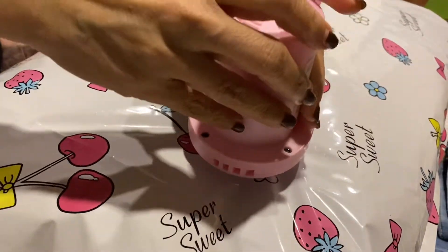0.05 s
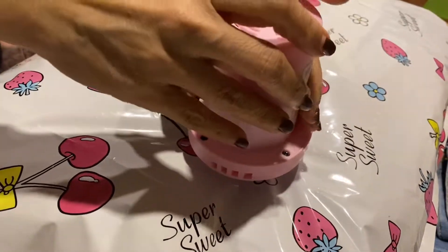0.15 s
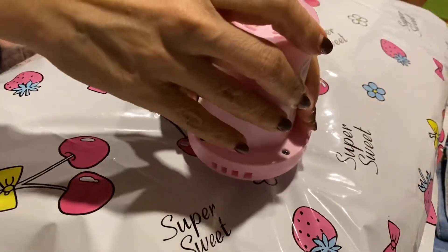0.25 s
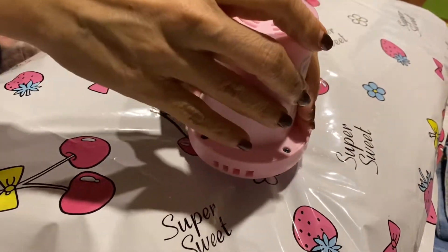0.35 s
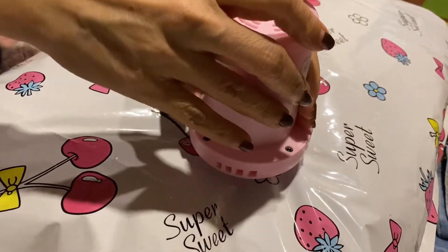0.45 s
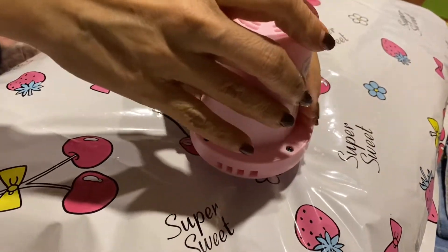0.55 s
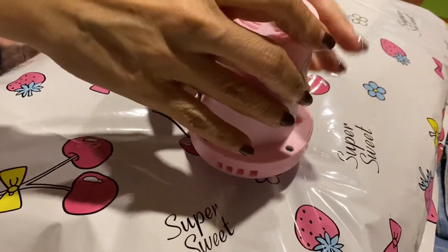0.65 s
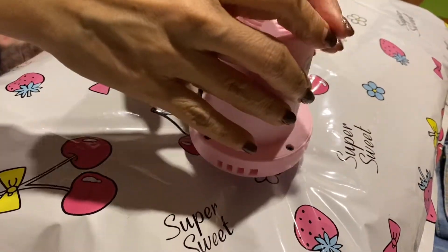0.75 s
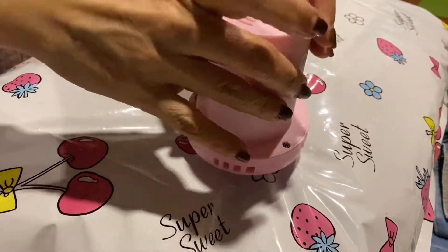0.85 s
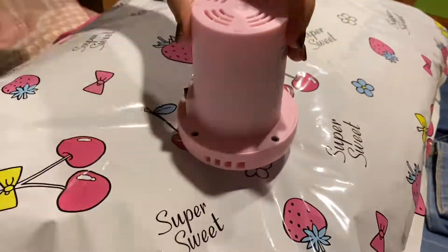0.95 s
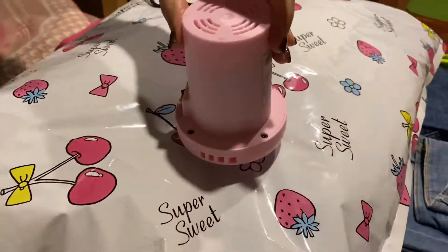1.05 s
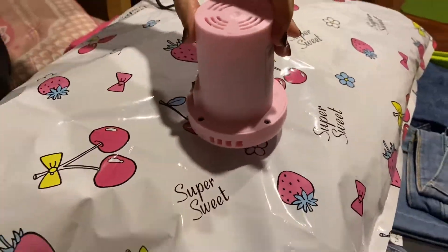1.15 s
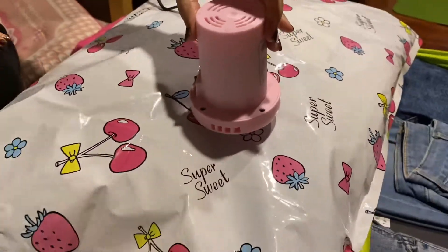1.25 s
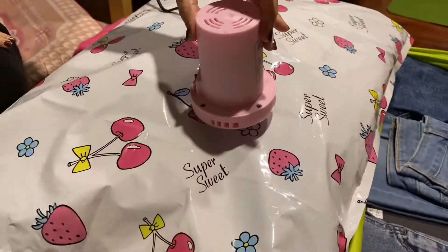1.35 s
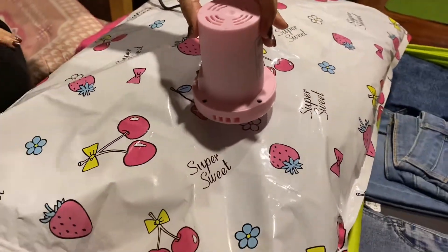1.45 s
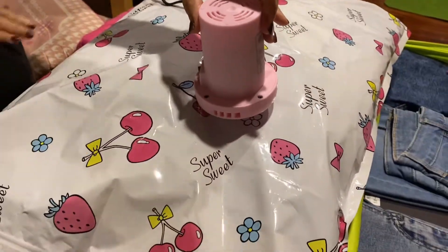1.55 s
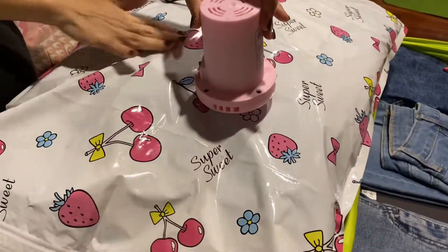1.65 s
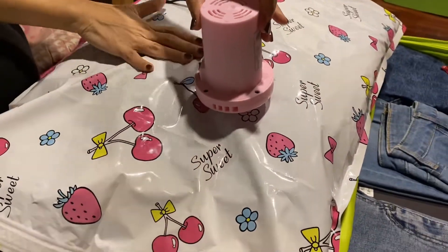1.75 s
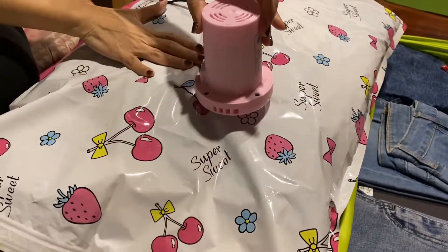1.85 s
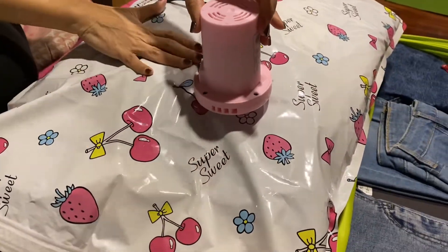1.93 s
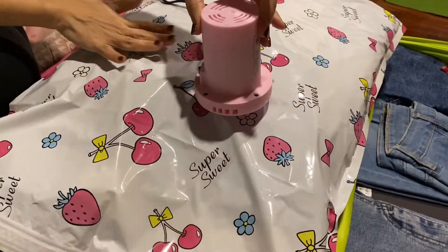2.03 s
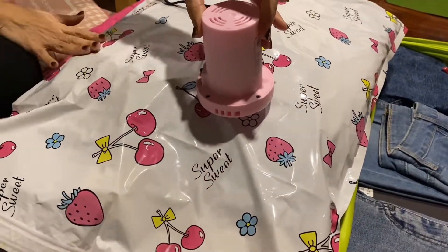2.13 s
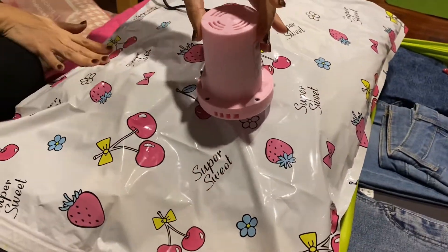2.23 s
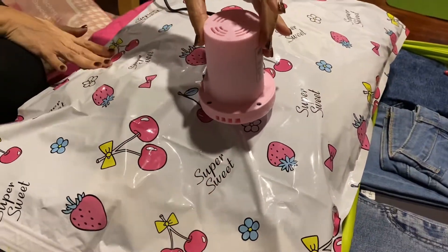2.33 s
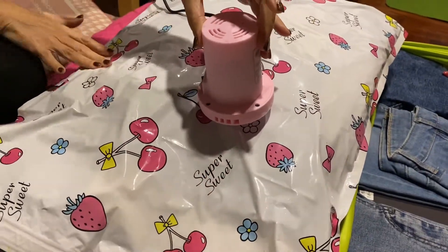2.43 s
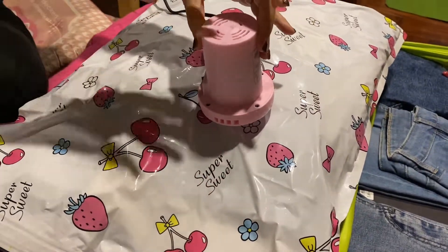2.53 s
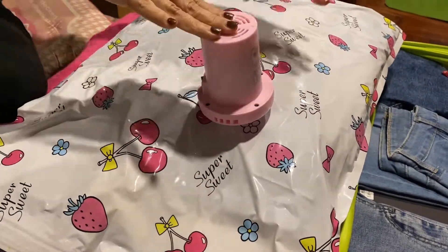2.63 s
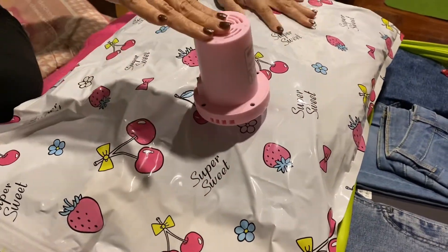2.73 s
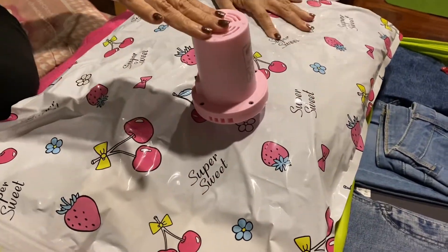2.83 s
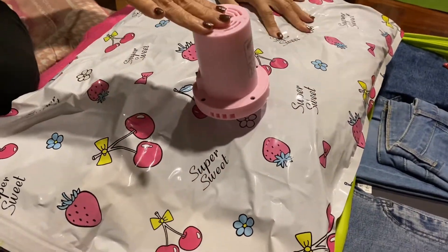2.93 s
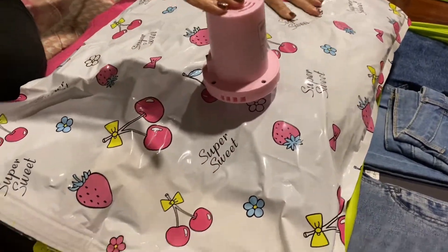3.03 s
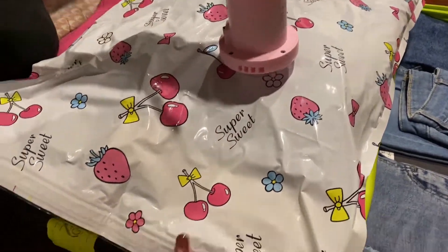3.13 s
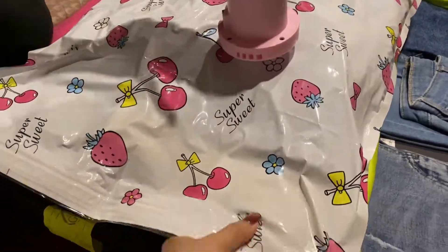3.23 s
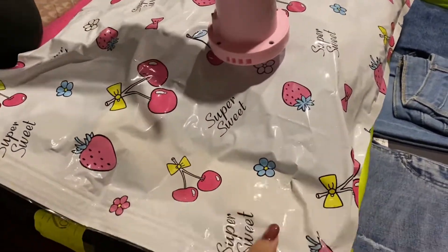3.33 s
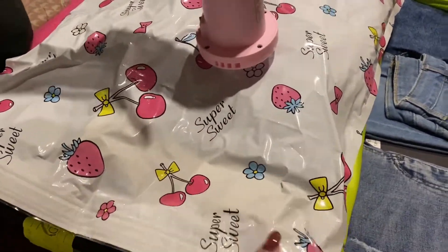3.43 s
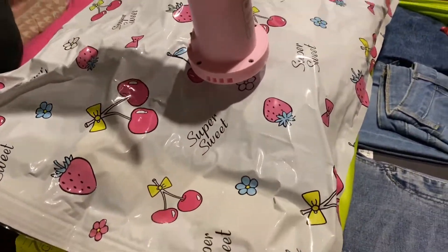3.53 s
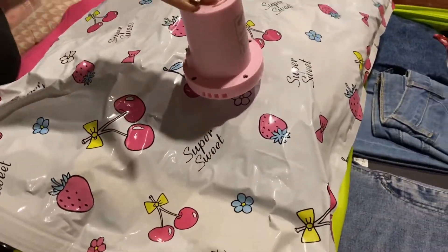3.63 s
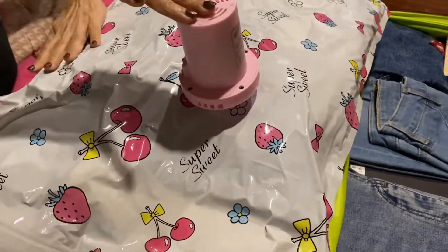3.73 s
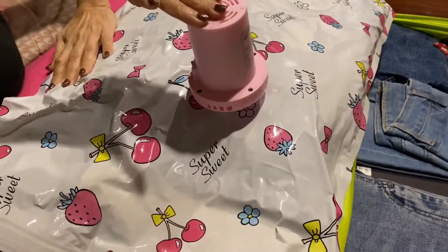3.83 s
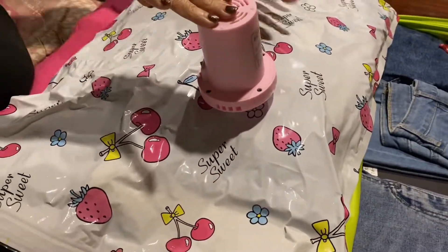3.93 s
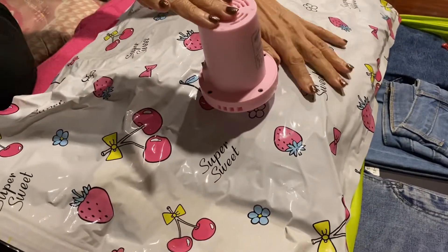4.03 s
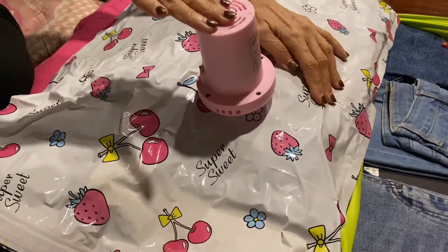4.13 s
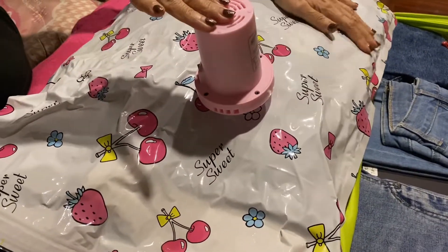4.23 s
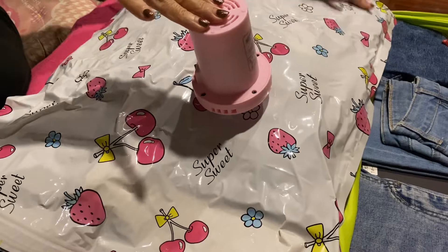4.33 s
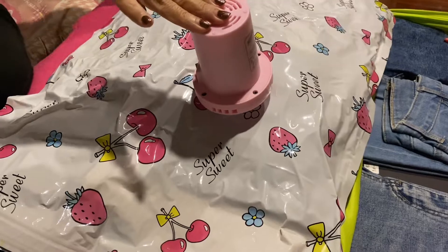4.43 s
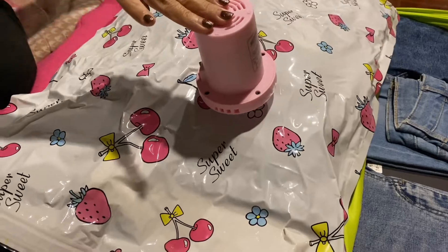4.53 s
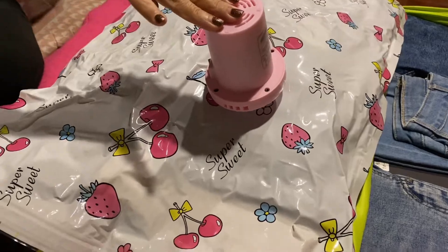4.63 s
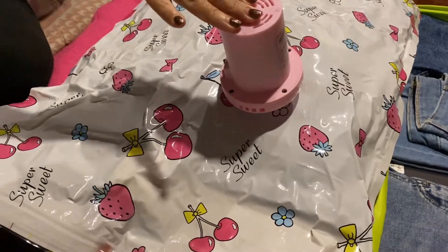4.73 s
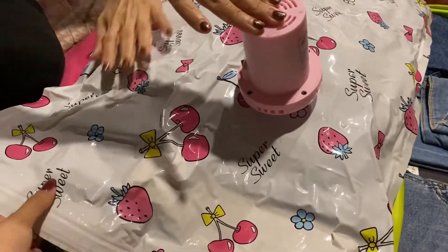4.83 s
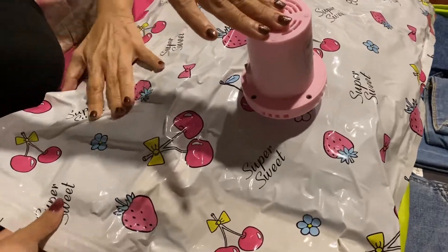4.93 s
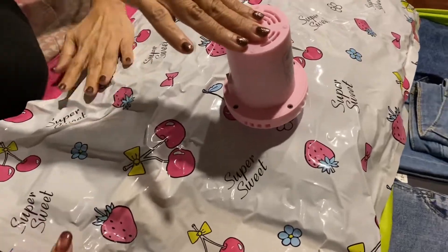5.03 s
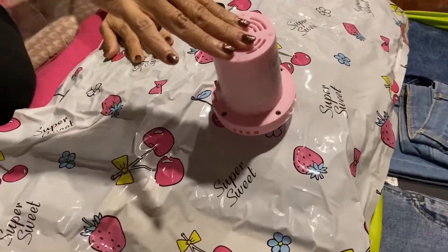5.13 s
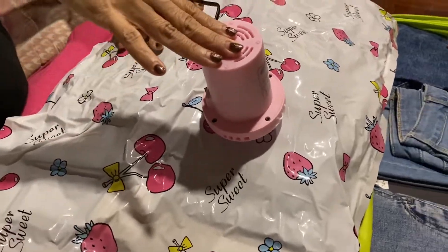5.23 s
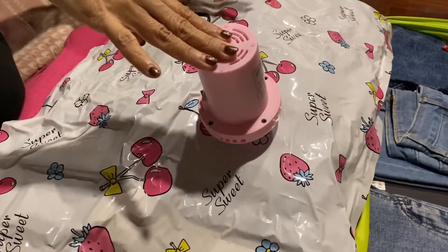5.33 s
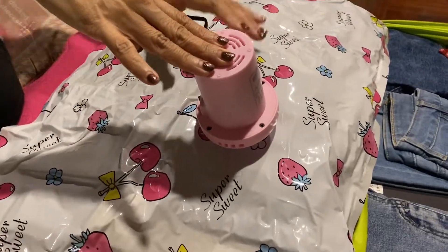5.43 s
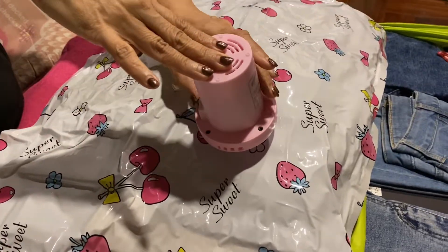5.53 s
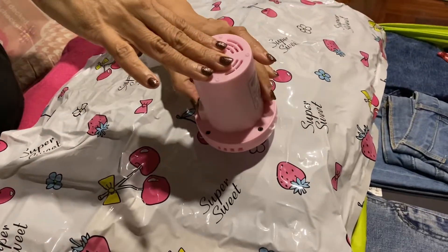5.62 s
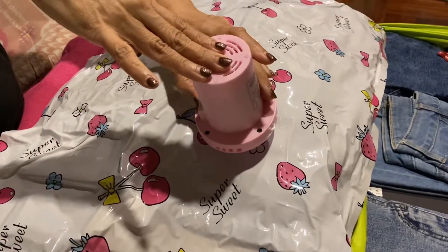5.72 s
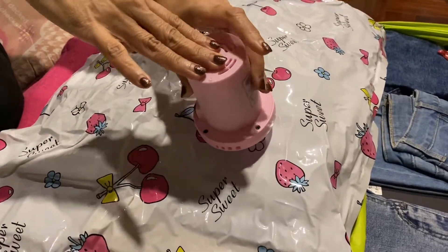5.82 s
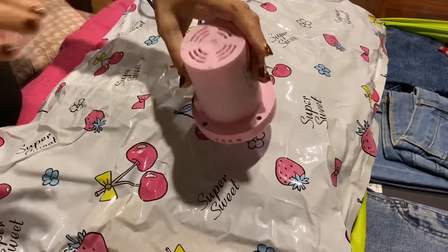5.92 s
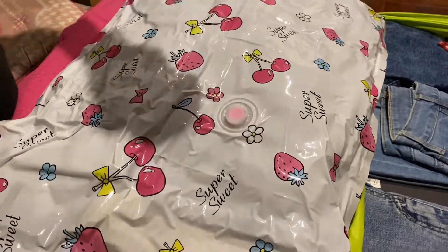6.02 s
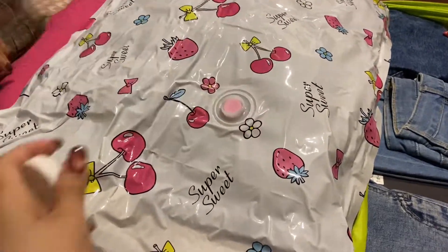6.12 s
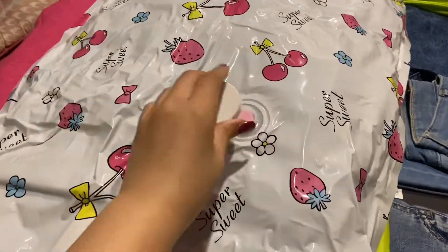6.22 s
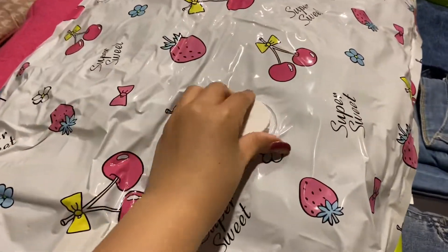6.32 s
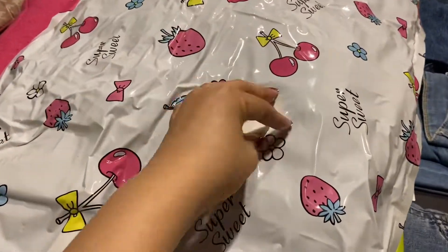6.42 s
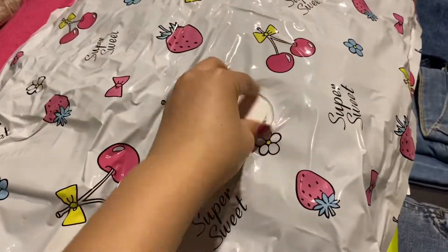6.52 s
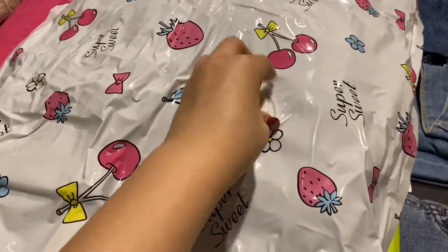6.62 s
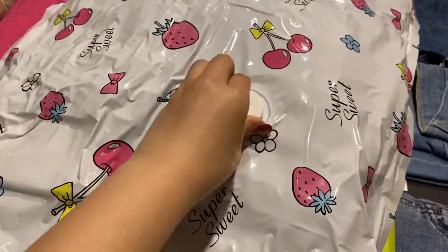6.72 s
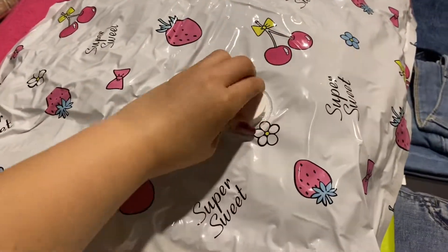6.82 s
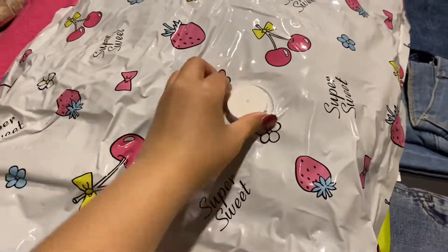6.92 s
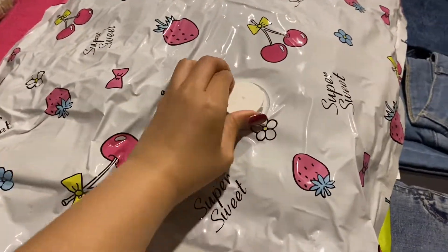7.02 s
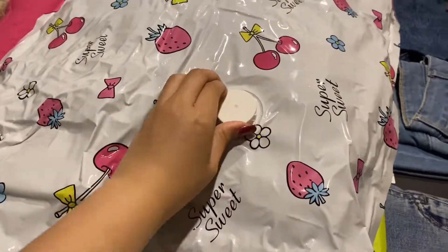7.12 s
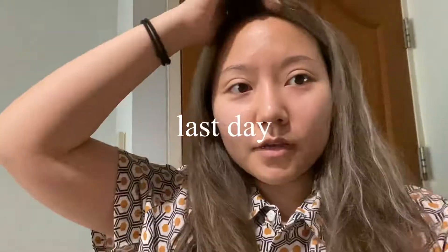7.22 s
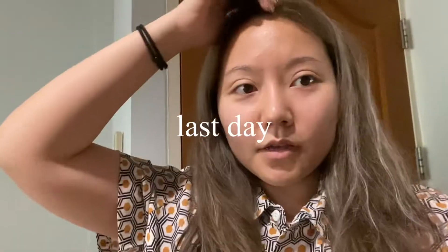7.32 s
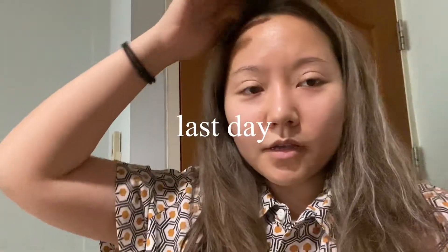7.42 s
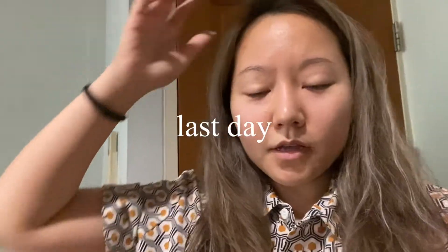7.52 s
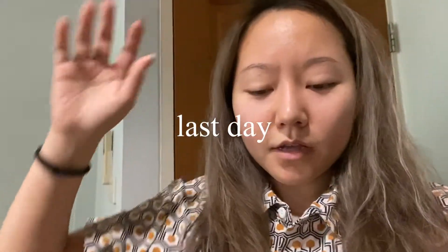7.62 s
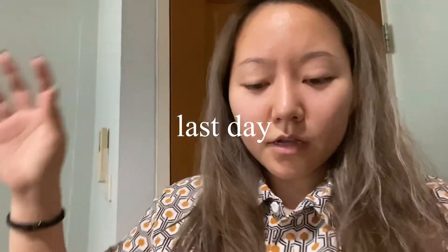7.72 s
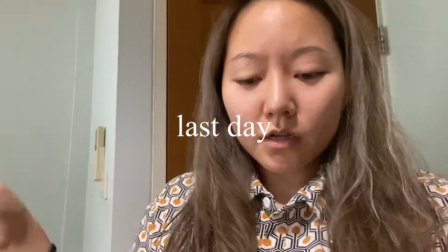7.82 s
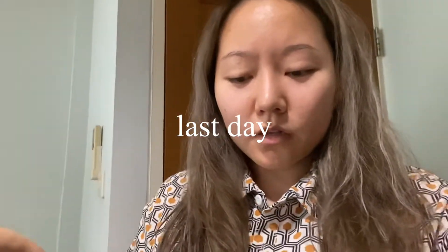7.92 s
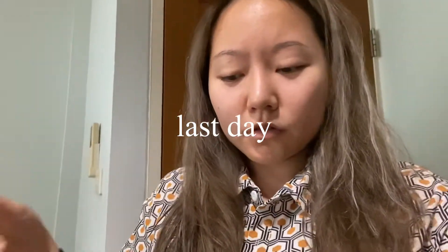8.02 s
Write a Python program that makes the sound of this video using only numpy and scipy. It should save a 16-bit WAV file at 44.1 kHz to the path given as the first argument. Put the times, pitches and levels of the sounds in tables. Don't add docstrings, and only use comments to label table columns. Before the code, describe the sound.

A phone held near a little handheld pump indoors: light handling taps, a switch tick, then a motor climbing in pitch. The sound suddenly becomes sped up, a piercing steady whine with rushing, hissing air that dips briefly twice and turns more resonant and whistling. Power goes off and the pitch slides down to silence. Sparse thin plastic crackles and tiny cap scrapes follow. Finally, a different softly humming room with two hard plastic snaps, then only hum.

```python
import sys
import numpy as np
from scipy import signal
from scipy.fft import rfft, irfft, next_fast_len
from scipy.io import wavfile
from scipy.ndimage import map_coordinates

SR = 44100
rng = np.random.default_rng(int(sys.argv[2]) if len(sys.argv) > 2 else 0)


def transcribe(u):
    v = np.clip(np.atleast_2d(u).T, -1, 1)
    q = np.round(v * 32767).astype(np.int16)
    wavfile.write(sys.argv[1], SR, q)


def rack_gain(trim_db):
    fader = np.asarray(trim_db, float)
    return 10 ** (fader / 20)


N = 355622
TIME_S = np.arange(N) / SR

CUTS = (0, .821, 7.205, 9)
PUMP, FAST_PUMP, BEDROOM, FAST_ROOM, OTHER_ROOM = (0, 1), (0, 4), (1, 1), (1, 4), (2, 1)
ON_S, OFF_S = .312, 5.677


def unit(x):
    return x / np.sqrt(np.mean(np.mean(np.atleast_2d(x), 0) ** 2) + 1e-20)


def along(points, hz):
    f, v = np.transpose(points)
    return np.interp(np.log(hz + 1), np.log(f + 1), v)


def curves(rows):
    s, *cols = np.transpose(rows)
    return [np.interp(TIME_S, s, c) for c in cols]


def between(t0, t1, fade=0.0023):
    return np.clip((TIME_S - t0) / fade + 1, 0, 1) * np.clip((t1 - TIME_S) / fade, 0, 1)


def bump(hz, centre_hz, width_hz):
    return np.exp(-((hz - centre_hz) / width_hz) ** 2)


def wobble(rate):
    return map_coordinates(rng.standard_normal(int(N * rate / SR) + 4), [np.arange(N) * rate / SR])


def filtered(x, response):
    m = next_fast_len(N + 8192)
    return irfft(rfft(x, m) * response(np.fft.rfftfreq(m, 1 / SR)), m)[..., :N]


def modes(table):
    def response(f):
        return sum((-1) ** k * rack_gain(db) * 1j * f * w / (c * c - f * f + 1j * f * w)
                   for k, (c, w, db) in enumerate(table))
    return response


def ports(pair, place, gain, alike=None):
    # pitch_hz, likeness_0_to_1, left_lead_rad, left_over_right_db
    port_table = [
        [(50, .95, 0, -1), (200, .95, .15, -1), (500, .95, .5, 2), (700, .8, .8, 5), (950, .92, .3, 2),
         (1250, .8, .8, 4), (1620, .6, 2.5, 4), (2000, .6, 6, 1), (2750, .7, 8.6, -1), (3120, .8, 9.1, 0),
         (3900, .6, 11.7, 0), (16000, .5, 40, 0)],
        [(20, .95, 0, -1), (200, .88, .2, -1), (330, .75, .4, -1), (700, .4, 1, 3), (1300, .4, 2.5, 1),
         (16000, .4, 30, -1)],
        [(60, .85, .1, -2), (200, .86, .1, -2), (450, .45, .4, 0), (800, .27, 1.5, 1), (2000, .25, 1.9, -2),
         (16000, .4, 9, -1)],
    ]
    row, pace = place

    def response(hz):
        f, *cols = np.transpose(port_table[row])
        like, lead, lean_db = (np.interp(hz / pace, f, c) for c in cols)
        likeness = like if alike is None else alike + 0 * hz
        turn = np.arccos(np.clip(likeness, 0, 1)) / 2
        left = rack_gain(lean_db / 2) * np.exp(.5j * lead)
        right = 1 / left
        a, b = np.cos(turn), np.sin(turn)
        middle = np.hypot(a * abs(left + right), b * abs(left - right)) / 2
        matrix = np.array([[a * left, b * left], [a * right, -b * right]])
        return matrix * gain(hz) / np.maximum(middle, .2)
    return filtered(pair, response).sum(1)


def rush(colour, body, place, lo_hz=0, hi_hz=3e4):
    def gain(hz):
        peaks = 1 + sum(rack_gain(2 * db) / (1 + (2 * (hz - c) / w) ** 2) for c, w, db in body)
        return rack_gain(along(colour, hz)) * np.sqrt(peaks) * (hz >= lo_hz) * (hz < hi_hz)
    return unit(ports(rng.standard_normal((2, N)), place, gain))


def whine(shaft_hz, orders, place, flutter_db, jitter):
    turns = np.cumsum(shaft_hz * (1 + jitter * wobble(60))) / SR
    x = 0
    for k, db in orders:
        level = rack_gain(db + 1.0 + flutter_db * wobble(40)) * (k * shaft_hz < 16000)
        x = x + level * np.sin(2 * np.pi * k * turns + k)
    return ports(np.array([x, 0 * x]), place, lambda hz: 1, alike=0.39)


def pumping():
    # time_s, shaft_hz, level_db
    spin = [(.82, 870, -44), (.85, 973, -37.5), (.9, 1162, -30), (.95, 1334, -33.5), (1, 1442, -34),
            (1.05, 1508, -33.5), (1.1, 1525, -38.5), (1.2, 1523, -40.5), (1.6, 1532, -47.5), (2, 1524, -45),
            (2.4, 1543, -46), (2.8, 1556, -50), (3.1, 1553, -44.5), (3.4, 1560, -48), (3.8, 1550, -50.5),
            (4.5, 1560, -43), (5.4, 1559, -45.5), (5.68, 1552, -45)]
    # time_s, covered_share
    hand = [(0, 0), (2.5, 0.16), (3.3, 0.52), (4.2, 0.84), (8, 0.71)]
    driven_hz, driven_db = curves(spin)
    cover = curves(hand)[0]
    choke_db = bag_choke()
    sag_hz_per_db, sag_s = 4.5, 0.0505
    keep = np.exp(-1 / (sag_s * SR))
    driven_hz = driven_hz - sag_hz_per_db * signal.lfilter([1 - keep], [1, -keep], choke_db)
    coast_s, friction_hz = .425, 490
    slowing = np.exp(-np.maximum(TIME_S - OFF_S, 0) / coast_s)
    hz = np.maximum((driven_hz + friction_hz) * slowing - friction_hz, 20)
    octaves = np.log2(hz / driven_hz)
    out = shaft_and_blades(hz, octaves, driven_db, cover, choke_db)
    out += vent_whistle(octaves, choke_db)
    out += casing_air(octaves, cover, choke_db)
    return out * between(0, 6.2, fade=0.055) + shell_ring()


def bag_choke():
    # start_s, length_s, depth_db
    chokes = [
        (2.6, 0.012, 9),
        (3.14, .075, 12.5),
    ]
    edge_s, open_s = .04, 0.0151
    return sum(db * between(s, 9, fade=edge_s) * between(0, s + length + open_s, fade=open_s)
               for s, length, db in chokes)


def shaft_and_blades(hz, octaves, driven_db, cover, choke_db):
    # shaft_multiple, over_shaft_db, gain_under_hand_db
    spin_orders = [(2, -7.5, -21), (3, -4.5, -5), (4, -10, -13), (5, -17.5, 4), (6, -15, -13),
                   (7, -6.5, -5.5)]
    # pitch_hz, level_db
    blade_answer = [(1700, -80), (2600, -62), (3480, -48.5), (4300, -34), (5150, -23.5), (5330, -37),
                    (5600, -37), (7400, -52), (9500, -54), (12000, -46)]
    # pitch_hz, level_db
    overtone = [(3600, -95), (4500, -71), (5600, -57), (7000, -64), (10400, -61), (11500, -84)]
    # time_s, over_answer_db
    blade_level = [(.82, 5.5), (.95, 10), (1.03, 3), (1.15, 9), (1.33, 7), (1.68, -5), (2, 0), (2.6, 1.5),
                   (3.3, 0.5), (3.8, 5), (4.3, 0), (4.9, 7), (5.2, -3), (5.66, 2), (5.72, -10)]
    coasting = TIME_S > OFF_S
    shaft_db = driven_db + 20 * octaves
    shaft_db += 8.5 * bump(hz, 1157, 54) * coasting
    shaft_db += (-4 * bump(hz, 1300, 46) + 0.1 * wobble(45)) * coasting
    blade_db = along(blade_answer, 8 * hz) + curves(blade_level)[0]
    blade_db += 2 * wobble(9) * (TIME_S < OFF_S) + .35 * choke_db
    upper_db = shaft_db - 11 * (1 - between(1.43, 7.4, fade=0.31))
    bearing_db = np.where(coasting, driven_db - 1 + 25 * octaves + 3 * wobble(50), -120)
    orders = [(1, shaft_db), (8, blade_db), (16, along(overtone, 16 * hz)), (1.19, bearing_db)]
    orders += [(k, upper_db + db + hand_db * cover) for k, db, hand_db in spin_orders]
    return whine(hz, orders, FAST_PUMP, flutter_db=0.0, jitter=0.00082)


def vent_whistle(octaves, choke_db):
    since_off = TIME_S - OFF_S
    level_db = -42 - 6 * abs(since_off) + 40 * octaves - choke_db
    return whine(3255 - 60 * since_off, [(1, level_db)], FAST_PUMP, flutter_db=2.0, jitter=0.00098)


def casing_air(octaves, cover, choke_db):
    # pitch_hz, level_db_per_hz
    colour = [(530, -38), (900, -20.5), (1400, -9.5), (1650, -10.5), (1950, 2.5), (2860, -2), (4150, 0.5),
              (5500, -3), (6560, -12), (8080, -10), (9800, -14.5), (11900, -16), (14800, -14.5),
              (15750, -13.5), (15950, -60)]
    # centre_hz, width_hz, level_db
    open_body = [(1910, 40, -20), (2455, 150, 3.5), (3358, 68, 9.5), (3720, 92, -4), (4200, 200, 6),
                 (10770, 560, 6.5)]
    # centre_hz, width_hz, level_db
    covered_body = [(1899, 100, 14), (2196, 210, 10), (2570, 69, 13), (3170, 30, -8), (3259, 69, 10.5),
                    (3700, 42, -4), (4007, 97, 6), (4122, 40, 11), (4660, 71, 6), (5040, 42, 7),
                    (5270, 60, 0), (5690, 94, 4.5), (6040, 44, 8), (7860, 44, 6.5)]
    # centre_hz, width_hz, level_db
    coasting_body = [(1730, 61, 10), (2200, 81, 8), (2480, 70, 7), (3150, 200, -1), (3700, 150, 6),
                     (4170, 150, 3), (5100, 300, -2)]
    # time_s, flow_db
    flow = [(.825, -34), (.87, -2), (.92, -4), (1, 1.5), (1.2, -6.5), (1.37, -1.6), (2.02, -4.5),
            (2.15, -2), (2.6, -0.7), (4.6, 0.57), (5.3, 1.5), (5.68, 2)]
    # level_db, flow_share, gain_under_hand_db, choke_share, coast_db_per_octave, surge_db
    layers = [
        (-44, 1.1, 5, 0.9, 17.5, -5),
        (-40, 0.9, -0.17, 0.62, 14.5, -30),
        (-50, 0.23, 1.4, 0.17, 11, -14.5),
    ]
    flow_db = curves(flow)[0]
    let_go_s = .04
    loose = between(OFF_S + let_go_s, 9, fade=let_go_s)
    from_peak_s = TIME_S - 0.913
    surge = rack_gain(-33.5 - np.maximum(-79 * from_peak_s, 30.5 * from_peak_s))
    out = 0
    bands_hz = [(0, 2900), (2900, 6000), (6000, 3e4)]
    for (db, flows, hand_db, choked, slope, surge_db), (lo, hi) in zip(layers, bands_hz):
        free = rush(colour, open_body, FAST_PUMP, lo, hi)
        shut = rush(colour, covered_body, FAST_PUMP, lo, hi)
        dying = rush(colour, coasting_body, FAST_PUMP, lo, hi)
        driven = np.sqrt(1 - cover) * free + np.sqrt(cover) * shut
        puffs = rack_gain(1.5 * wobble(35)) * dying
        level_db = db + flows * flow_db + hand_db * cover - choked * choke_db + slope * octaves
        level = np.hypot(rack_gain(level_db), rack_gain(surge_db) * surge)
        unsteady = rack_gain(0.47 * wobble(12) + 0.15 * wobble(220))
        out = out + level * unsteady * (np.sqrt(1 - loose) * driven + np.sqrt(loose) * puffs)
    surge_colour = [(900, -90), (1800, -42), (2600, 6), (3300, 5), (4400, 0.5), (6000, -17),
                    (15700, -8.5), (15950, -60)]
    return out + surge * rush(surge_colour, [], FAST_PUMP)


def shell_ring():
    # start_s, level_db, t60_s
    rings = [
        (5.966, -42, 0.081),
        (6.112, -59, 0.1),
        (6.19, -71, 0.17),
    ]
    out, t = np.zeros(N), np.arange(SR // 4) / SR
    for s, db, t60 in rings:
        swell = 1 - np.exp(-t / 0.0076)
        out[round(s * SR):][:len(t)] += rack_gain(db - 60 * t / t60) * swell * np.sin(2 * np.pi * 3140 * t)
    return out


def run_up():
    hz = np.clip(365 * (TIME_S - .268), 5, 400)
    octaves = np.log2(hz / 198)
    return run_up_tones(hz, octaves) + run_up_air(hz, octaves) + hum_and_whistle(hz) + coil_ticks()


def run_up_tones(hz, octaves):
    # shaft_multiple, over_shaft_db
    start_orders = [(2, -14), (3, -22), (4, -8), (6, -8)]
    # pitch_hz, level_db
    blade_answer = [(440, -66), (600, -46), (980, -36), (1300, -38), (1600, -36)]
    shaft_db = -33.5 + 20.5 * octaves
    orders = [(1, shaft_db), (8, along(blade_answer, 8 * hz))]
    orders += [(k, shaft_db + db) for k, db in start_orders]
    return whine(hz, orders, PUMP, flutter_db=0.5, jitter=0.0014) * between(0.4, 9, fade=.05)


def run_up_air(hz, octaves):
    # pitch_hz, level_db_per_hz
    colour = [(150, -54), (250, -11), (484, -4), (576, -1.5), (674, -1.5), (1400, -7.5), (1790, -8.5),
              (4410, -3), (8400, -20), (10200, -8.5), (12100, -27), (14700, -11), (16000, -43)]
    # centre_hz, width_hz, level_db
    body = [(464, 57, 8), (570, 57, 2), (664, 67, 8.5), (780, 58, -3), (815, 76, 5), (955, 160, 8.5),
            (1070, 66, 0)]
    # level_at_scene_change_db, slope_db_per_octave, while_aligning_db
    layers = [
        (-22.5, 15.5, -58),
        (-36, 16, -58),
        (-41.5, 26, -63),
    ]
    jolt = 1 + 11 * np.exp(-abs(TIME_S - ON_S) / 0.0043)
    align = jolt * between(0, 0.397, fade=0.045)
    roar, hiss, fizz = (np.hypot(rack_gain(db + slope * octaves), rack_gain(align_db) * align)
                        for db, slope, align_db in layers)
    beat = rack_gain(1.7 * np.sin(2 * np.pi * np.cumsum(hz) / SR))
    hiss_body = [(2670, 110, 5.8), (3670, 69, 4.1), (4530, 130, 3.2), (6500, 530, 2.8)]
    air = rack_gain(-5.5) * roar * beat * rush(colour, body, PUMP, hi_hz=1790)
    air += hiss * rush(colour, hiss_body, PUMP, lo_hz=1740, hi_hz=11800)
    air += fizz * rush(colour, [], PUMP, lo_hz=11900)
    return air * between(ON_S, 9)


def hum_and_whistle(hz):
    # time_s, pitch_hz, level_db
    chirp = [
        (.33, 14150, -91),
        (.374, 14900, -46),
        (.395, 15550, -65),
        (.41, 15600, -86),
    ]
    hum_db = -41 - 3 * np.clip(TIME_S - ON_S, 0, 1) + 18 * bump(hz, 141, 13)
    hum = whine(786 + 0 * hz, [(1, hum_db - 9.0)], PUMP, flutter_db=1.0, jitter=0.0027)
    chirp_hz, chirp_db = curves(chirp)
    whistle = whine(chirp_hz, [(0.98, chirp_db)], PUMP, flutter_db=5, jitter=.012)
    return (hum + whistle * between(0, 0.397)) * between(ON_S, 9)


def coil_ticks():
    # centre_hz, width_hz, level_db
    coils = [(3800, 560, 2.5), (5200, 690, 2), (7100, 900, 2)]
    step_on_s, climb_per_s2 = .393, 1280
    steps = np.floor(climb_per_s2 / 2 * np.maximum(TIME_S - .306, 0) ** 2 + .55)
    kicks = np.diff(steps, prepend=0) * (TIME_S > step_on_s) * (TIME_S < CUTS[1])
    level_db = -43 + 11 * np.clip(TIME_S - step_on_s, 0, 1) + 2.9 * wobble(150) + 14.5
    dry = filtered(kicks * rack_gain(level_db), modes(coils))
    return ports(np.array([dry, 0 * dry]), PUMP, lambda hz: 1 / (1 + (hz / 8300) ** 8), alike=0.53)


def handling():
    # start_s, peak_db, pitch_hz
    touch = [(.002, -24.5, 920), (.038, -32, 1520), (0.054, -30, 2320), (.068, -31, 1420),
             (.079, -30, 3800), (.085, -30, 1500), (.119, -32, 4200), (.146, -46, 9800), (.167, -28, 660),
             (.17, -35, 2000), (.184, -48, 3800), (0.2715, -25, 480), (.271, -33, 1800), (.271, -33, 3240),
             (.271, -39, 6500)]
    # start_s, peak_db, pitch_hz
    crackle = [(6.176, -55, 6180), (6.2057, -63, 3160), (6.265, -50, 3170), (6.2704, -45, 4170),
               (6.2845, -53.5, 4080), (6.2877, -63.6, 3770), (6.3054, -50, 4960), (6.3104, -55, 3910),
               (6.319, -45, 3930), (6.3237, -53, 3940), (6.3266, -48, 3830), (6.331, -45, 3570),
               (6.352, -50, 8000), (6.367, -63.9, 3550), (6.398, -52, 5450), (6.4085, -57, 5660),
               (6.4213, -39, 4400), (6.4249, -50, 4900), (6.428, -55, 7520), (6.4535, -65, 4640),
               (6.495, -35.5, 4900), (6.5112, -66, 5300), (6.5174, -66, 4910), (6.5274, -42, 7990),
               (6.5316, -45, 5350), (6.5377, -55, 6230), (6.5411, -54.2, 4970), (6.5441, -53.2, 4840),
               (6.5577, -57, 4850), (6.5637, -47, 5070), (6.5817, -51, 5470), (6.5977, -50, 5030),
               (6.6084, -53, 6250), (6.6533, -32, 8400), (6.6617, -45, 8050), (6.8258, -63, 3390),
               (6.8572, -62.3, 3610), (6.8643, -52, 4410), (6.8908, -59, 7670), (6.8981, -64, 5360),
               (6.9062, -34.5, 3850), (6.9102, -40, 5700), (6.914, -47, 3950), (6.9229, -68, 4320),
               (6.9314, -45, 7750), (6.9357, -55.4, 6390), (6.9393, -55.0, 6660), (6.9586, -62, 2300),
               (6.962, -62.0, 2670), (6.9667, -62.9, 2340), (6.9745, -62.3, 2870), (6.9971, -64, 3420),
               (7.0761, -64, 4630), (7.1339, -56, 4010), (7.1627, -56, 4280), (7.1746, -67, 6010),
               (7.1892, -50, 3970)]
    # start_s, peak_db
    thread = [(7.0098, -57), (7.0192, -42), (7.0225, -45), (7.0256, -44), (7.0295, -49.7), (7.0419, -48),
              (7.0467, -51), (7.0515, -47), (7.0563, -54.5), (7.0625, -55)]
    # centre_hz, width_hz, level_db
    cap = [(1690, 700, 0.5), (4460, 920, 1), (10100, 2500, -8)]
    dry, slips, t = np.zeros(N), np.zeros(N), np.arange(SR // 20) / SR
    for s, db, hz in touch:
        ring = np.sin(2 * np.pi * hz * t) * (1 - np.exp(-t * hz))
        dry[round(s * SR):][:len(t)] += rack_gain(db - 6 - 60 * t * hz / 13) * ring
    for s, db, hz in crackle:
        ring = np.sin(2 * np.pi * hz * t) * rack_gain(-60 * t * hz / 12)
        ring += np.sin(2 * np.pi * 1900 * t) * rack_gain(-14.0 - 60 * t / 0.0089)
        puff = rng.standard_normal(len(t)) * rack_gain(-3.5 - 60 * t / 0.0052)
        dry[round(s * SR):][:len(t)] += rack_gain(db - 1.0) * (ring + puff)
    for s, db in thread:
        slips[round(s * SR)] = rack_gain(db + 14.5)
    dry = dry + filtered(slips, modes(cap))

    def band(hz):
        return 1 / (1 + (300 / (hz + 1)) ** 4) / (1 + (hz / 16000) ** 4)
    return ports(np.array([dry, np.roll(dry, 30)]), FAST_PUMP, band, alike=0.74) + rubbing()


def rubbing():
    # start_s, length_s, level_db
    rustle = [(6.265, .024, -72), (6.317, 0.016, -62.5), (6.524, 0.076, -67.5), (6.527, 0.015, -65),
              (6.653, 0.0099, -63), (6.898, 0.022, -77), (6.964, 0.019, -73), (7.135, 0.011, -68),
              (7.29, 0.03, -61), (7.942, 0.061, -73.5), (8.055, .02, -55.5)]
    # start_s, length_s, level_db
    sleeve = [
        (0.01, 0.14, -61),
        (7.41, 0.17, -67),
    ]
    film_colour = [(300, -92), (1000, -25.5), (2000, -15), (5000, -26.5), (12000, -27.5), (16000, -31.5)]
    cloth_colour = [(700, -60), (1500, 1.0), (2500, -0.5), (4300, -15.5), (7000, -24), (16000, -52)]
    strokes = sum(rack_gain(db) * between(s, s + length, fade=0.004) for s, length, db in rustle)
    sweeps = sum(rack_gain(db) * between(s, s + length, fade=0.086) for s, length, db in sleeve)
    film = strokes * rack_gain(2.5 * wobble(180)) * rush(film_colour, [], FAST_ROOM)
    return film + sweeps * rack_gain(4.5 * wobble(21)) * rush(cloth_colour, [], OTHER_ROOM)


def switch():
    # start_s, snap_db, thud_db, life_s
    contacts = [(7.2177, -22.5, -34.5, 0.012), (7.22, -15, -58, 0.0046), (7.2223, 0, -26, 0.0032),
                (7.223, -30, -35, 0.0096), (7.226, -69.5, -66, 0.62), (7.229, -36.5, -63, 0.0094),
                (7.321, -40.5, -63, 0.0042), (7.3284, 1, -19, 0.0045), (7.3302, -6.5, -48.5, 0.0036),
                (7.3435, -58.5, -72.5, 0.087), (.3085, -25, -60, .005), (0.3105, -27, -46, 0.002),
                (0.311, -22, -51, 0.0012), (0.301, -60, -70, 0.49)]
    # centre_hz, width_hz, level_db
    snap_modes = [(844, 195, -26), (2040, 145, -15.5), (2720, 130, -12.5), (3400, 300, -8.5),
                  (3910, 296, 0), (6480, 420, 0), (8400, 980, -8.5), (9970, 470, 1), (10770, 750, -4.5),
                  (13770, 480, 1), (15900, 510, -14)]
    # centre_hz, width_hz, level_db
    press_modes = [(832, 200, -25), (2800, 300, -7), (3940, 290, -6), (6100, 560, 1), (7800, 280, -6),
                   (8660, 330, 2.5), (10300, 410, 3), (12400, 300, 2), (14100, 400, -1)]
    # pitch_hz, t60_s
    walls = [(200, 0.18), (2000, 0.202), (6500, 0.2), (14000, 0.17)]
    release_s = 7.3
    bursts, thuds, t = np.zeros((2, N)), np.zeros(N), np.arange(SR // 5) / SR
    for s, snap_db, thud_db, life in contacts:
        pressing = int(CUTS[2] < s < release_s)
        swell = 1 - np.exp(-t / 0.00013)
        burst = rack_gain(snap_db - 25 * t / life) * swell * rng.standard_normal(len(t))
        bursts[pressing, round(s * SR):][:len(t)] += burst
        thuds[round(s * SR):][:len(t)] += rack_gain(thud_db - 60 * t / 0.032) * np.sin(2 * np.pi * 185 * t)
    snap = rack_gain(3.5) * filtered(bursts[0], modes(snap_modes))
    press = rack_gain(3.5) * filtered(bursts[1], modes(press_modes))
    dry = snap + press + thuds
    side = np.roll(rack_gain(-30) * snap + rack_gain(-15) * press, 7)
    knock = 1.1 * np.sin(2 * np.pi * 850 * t) + np.sin(2 * np.pi * 330 * t)
    dry[round(7.222 * SR):][:len(t)] += rack_gain(-28.5 - 60 * t / 0.037) * knock
    hz, t, z = signal.stft(rng.standard_normal(SR // 3), SR, nperseg=256)
    tail = signal.istft(z * rack_gain(-60 * t / along(walls, hz)[:, None]), SR, nperseg=256)[1]
    tail = tail / np.linalg.norm(tail)
    reverb = rack_gain(-57.5) * signal.fftconvolve(np.pad(dry, (500, 0)), tail)[:N]
    return dry + side * [[1], [-1]] + reverb


def rooms():
    # pitch_hz, level_db_per_hz
    room = [
        [(12, -64), (20, -5), (96, 3), (210, -7), (248, -8.5), (319, -6), (1860, -21.5), (4180, -43),
         (8410, -59), (14700, -63), (16000, -61)],
        [(47, -61), (80, -55), (149, 2.5), (395, -3.5), (527, -1), (601, 3.5), (672, 1.5), (958, -3),
         (1070, -6.5), (2720, -16.5), (8230, -26.5), (16000, -45)],
        [(12, -43), (20, -7), (91, -11), (172, -5), (262, -15.5), (293, -9.5), (825, -14.5), (1220, -25.5),
         (1910, -25), (3160, -40.5), (9400, -57.5), (12100, -58), (16000, -77.5)],
    ]
    # centre_hz, width_hz, level_db
    hums = [
        [(101, 19, -3), (245.4, 9.9, 15.5)],
        [(210.4, 18, 10), (356, 35, 8.5), (635, 79, -17)],
        [(154, 28, 7), (159, 20, 6.5), (228.4, 10, 16.5), (297.5, 4.8, 14), (469.3, 7.7, 8.5), (602, 23, 3.5)],
    ]
    room_db = [-48.5, -67, -46.5]
    # pitch_hz, level_db
    mains = [(399, -75), (581, -80), (964, -73.5)]
    murmur = 0
    for k, place in enumerate((BEDROOM, FAST_ROOM, OTHER_ROOM)):
        level = rack_gain(room_db[k] + 0.19 * wobble(6.5)) * between(CUTS[k], CUTS[k + 1], fade=0.001)
        murmur = murmur + level * rush(room[k], hums[k], place)
    murmur *= rack_gain(4.4 * between(5.86, CUTS[2], fade=0.074))
    tones = whine(np.ones(N), mains, FAST_ROOM, flutter_db=0.5, jitter=0.0008)
    return murmur + tones * between(CUTS[1], CUTS[2])


def scene():
    pump = run_up() * between(0, CUTS[1]) + pumping() * between(CUTS[1], CUTS[2])
    return pump + handling() + switch() + rooms()


def top_cut(x):
    return signal.sosfilt(signal.butter(12, 16790, fs=SR, output="sos"), x)


def record(dry):
    def treble(hz):
        band_limit = np.clip((16300 - hz) / 600, 0, 1) ** 2
        return band_limit * rack_gain(-6 * bump(hz, 12050, 250))
    mix = filtered(dry, treble)
    return top_cut(mix)


dry = scene()
out = record(dry)
transcribe(out)
```